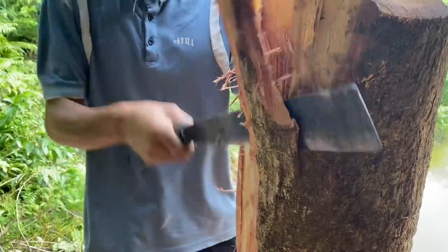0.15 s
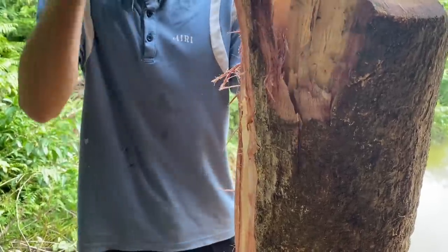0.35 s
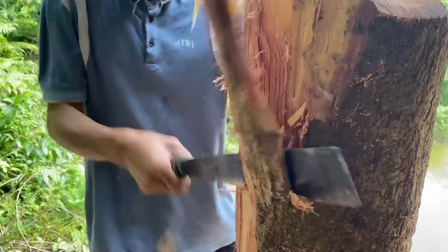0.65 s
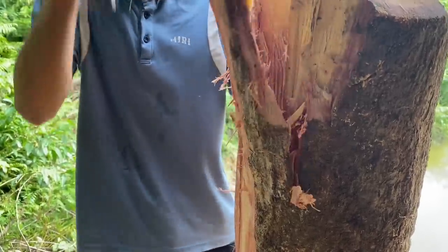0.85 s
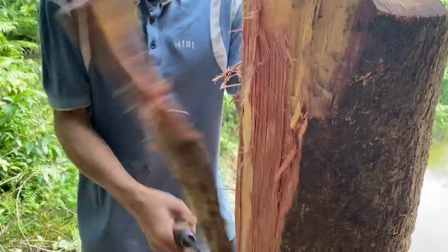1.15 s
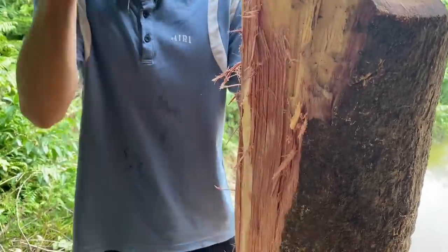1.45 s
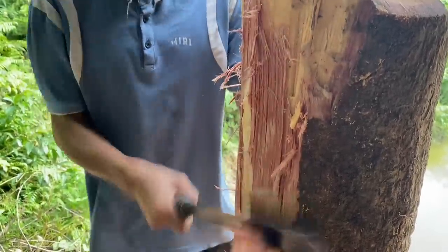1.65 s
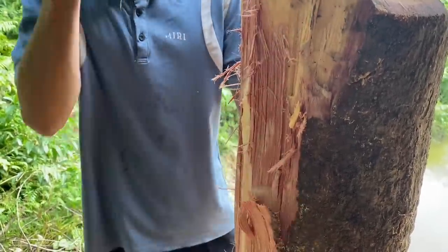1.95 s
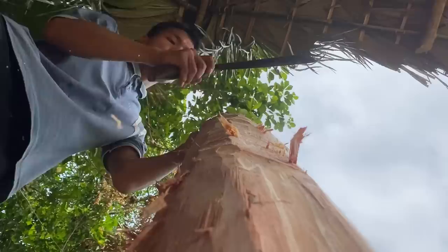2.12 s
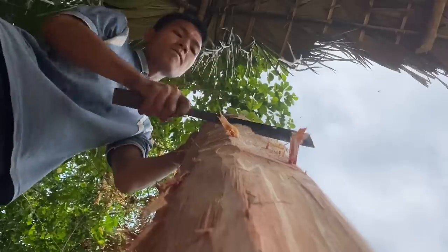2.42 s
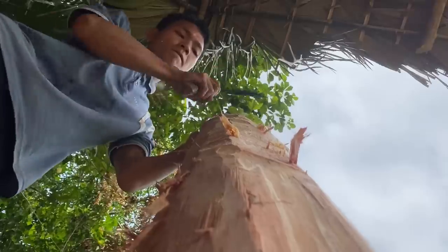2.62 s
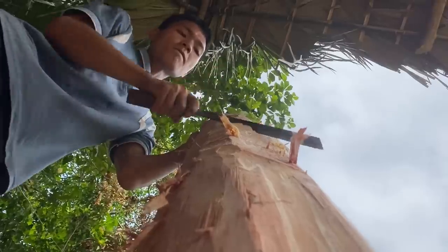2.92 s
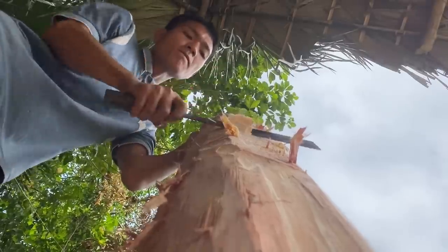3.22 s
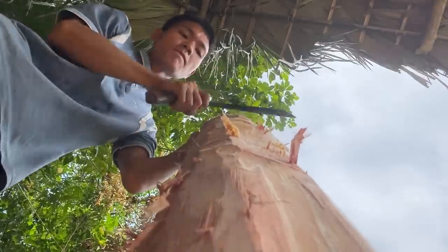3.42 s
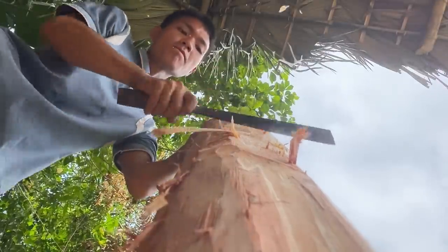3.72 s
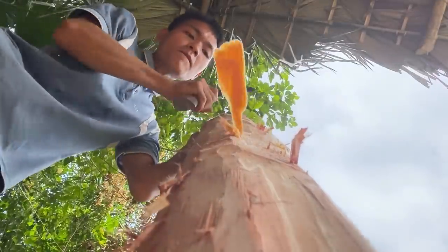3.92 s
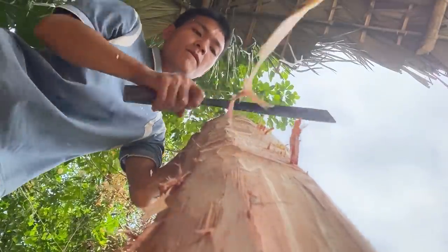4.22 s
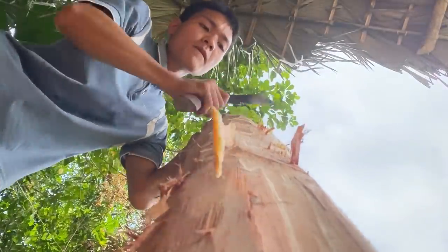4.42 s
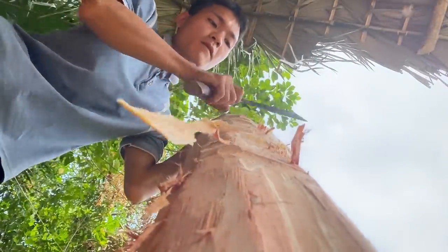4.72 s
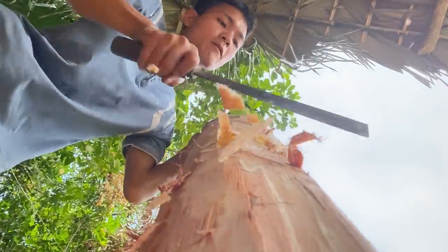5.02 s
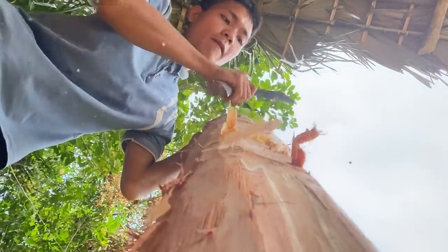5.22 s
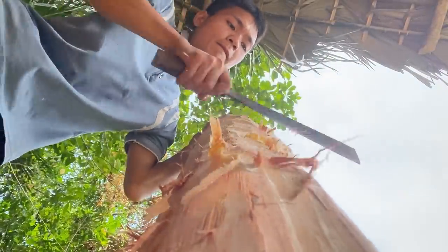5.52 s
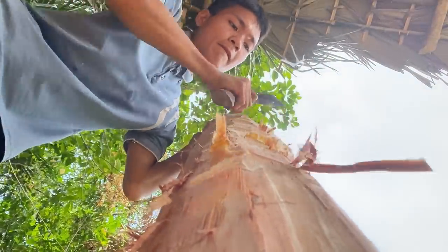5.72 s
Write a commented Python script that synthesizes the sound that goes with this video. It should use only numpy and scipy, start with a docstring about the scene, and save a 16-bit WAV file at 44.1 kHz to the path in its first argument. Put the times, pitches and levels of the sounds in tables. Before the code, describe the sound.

Outdoors, quiet air and a thin steady insect hiss lie under regular machete blows on a standing log. From 0 to 2.1 s the microphone is beside the cut: strokes at about 0.04, 0.54, 1.05, 1.63 and 2.12 s are bright, dry, fibrous cracks with short damped steel clinks, rustling shirt and low puffs of air. A scrape follows the first at 0.2 s; a strip tears at 1.05 s and chips tick around 1.2-1.3 s. At 2.16 s the perspective abruptly changes to the foot of the log. Blows at 2.38, 2.79, 3.21, 3.62, 4.04, 4.5, 4.91, 5.37 and 5.82 s are duller cracks with a prominent hollow knock around 550 Hz and low ground jolts, the hardest being the early ones. Small ticks and scrapes fall between, a woody tap at 3.35 s, dull bumps near 5.28 s. The background becomes lower and duller; reverberation stays short.

```python
"""A machete trims a standing log outdoors, over a slight breeze and a faint hiss of insects.
At first we listen beside the cut: bright cracks of bursting fibres, clinks of steel, rustling cloth, puffs of air.
Then we listen at the foot of the log: duller cracks, a loud hollow knock and jolts of the ground.
Fibres and chips are enveloped noise with a resonance; log, ground and steel are sums of swelling modes;
puffs, cloth, air and insects are coloured noise."""
import sys
import numpy as np
from scipy import signal
from scipy.fft import rfft, irfft, next_fast_len
from scipy.io import wavfile
from scipy.ndimage import uniform_filter1d

SR = 44100
rng = np.random.default_rng(int(sys.argv[2]) if len(sys.argv) > 2 else 0)


def output_pcm(signal):
    """Save a mono or channel-first signal as 16-bit PCM at the path in sys.argv[1].

    Samples are clipped to [-1, 1] before scaling.
    """
    pcm = np.clip(np.atleast_2d(signal).T, -1, 1) * 32767
    wavfile.write(sys.argv[1], SR, np.round(pcm).astype(np.int16))


N = 258426
TIME = np.arange(N) / SR
AGE = np.arange(12000) / SR   # time since the start of one short sound [s]
MOVE_S = 2.16   # the listening place changes

# blade bites, up to three in a stroke: (time [s], cutting time [s], 60 dB fade before band shares [s],
# crack level [dB], brightness [dB], splinter pitch [Hz], splinter level [dB], knock level [dB],
# knock pitch [Hz], knock overtones [dB])
BITES = [(0.039, 0.0029, 0.038, -20, 1.5, 1076, 10, -36, 560, -3),
         (0.0467, 0.0079, 0.041, -23.5, 8, 1042, -2, -38, 537, -11),
         (0.5404, 0.0037, 0.07, -20, 7, 2480, 1.5, -42, 562, 8.5),
         (0.547, .0027, 0.028, -23, 6.5, 1770, 4.5, -41, 550, 8.5),
         (1.0493, 0.0031, 0.042, -19, 4, 3480, -6, -53.5, 584, 7),
         (1.6287, .0063, 0.043, -23, 9.5, 2360, 15.5, -47, 524, -7.5),
         (2.114, 0.0062, 0.032, -42.5, 14, 2020, 6.5, -74.5, 557, 3.5),
         (2.1224, 0.0029, .071, -22.5, 6.5, 1580, -1, -36, 522, 4.5),
         (2.3797, 0.0045, 0.029, -21.5, -3, 1355, 5, -16, 558.4, -7.5),
         (2.7912, 0.002, 0.017, -14.5, -8, 1210, 8, -15.5, 542, -5.5),
         (3.209, 0.0014, 0.06, -16.5, -0.5, 874, 1, -18, 531.6, 1),
         (3.6097, 0.0023, 0.053, -26, -4, 903, 0.5, -24.5, 548.5, 3.5),
         (3.619, 0.0014, 0.081, -19.5, 0, 870, -3, -27, 568, 1),
         (3.645, 0.0033, 0.046, -27, -1, 840, 20, -26, 546, -7.5),
         (4.0322, 0.0037, 0.069, -32.5, -6.5, 827, 6.5, -28.5, 525.3, 7),
         (4.0433, 0.0037, 0.043, -23.5, -3.5, 778, 10.5, -29.5, 569, 3.5),
         (4.078, .0016, 0.031, -23, 8, 11000, 9, -51, 540, -2),
         (4.502, 0.0033, 0.015, -22.5, -1.5, 2180, 5.5, -21.5, 545, -10.5),
         (4.907, 0.0025, 0.025, -32, -2.5, 2140, 4.5, -27, 542, 0.5),
         (4.915, 0.0044, 0.012, -20.5, 2.5, 5500, -2, -46, 571, 14),
         (5.371, 0.006, 0.0097, -25.5, 7.5, 6300, -12, -26.5, 544, -0.5),
         (5.8187, 0.0078, 0.075, -33.5, 3.5, 2980, 2, -27, 541, -3.5)]
# strips peeling off behind the edge: (time [s], length [s], level [dB])
TEARS = [(1.058, .015, -31), (4.084, 0.013, -39.5), (4.94, 0.0041, -35), (5.386, 0.021, -37),
         (5.841, .03, -39.5)]
TEAR_T60_S, TEAR_HZ = 0.084, 6050
# colour of bursting fibres: (frequency [Hz], relative level [dB per Hz])
FIBRE_COLOUR = [(60, -16.5), (250, 10), (700, 3.5), (1200, -2), (3000, -1.5), (5000, -8), (7600, -6.5),
                (8600, -17), (9600, -3.5), (11500, -4.5), (13000, -13.5), (15500, -16), (17000, -38)]
# edges of the low, middle and high crackle bands: (frequency [Hz])
BAND_EDGES_HZ = [40, 950, 5000, 19000]
# nominal centres of those bands: (frequency [Hz])
BAND_CENTRES_HZ = [500, 2500, 9000]
# blade modes, damped by the gripping wood: (pitch [Hz], relative level [dB], swell time [s], left-right [dB])
BLADE_MODES = [(1110, -14.5, 0.00057, -2), (1756, -19, 0.0013, -2), (2071, 4, 0.0033, -0.5),
               (2336, 0, 0.0023, 6.5), (2570, -5, 0.0019, -5), (3330, -10.5, 0.0053, -4),
               (4420, -20, 0.0023, 2.5), (4500, -14, 0.011, -1.5), (5464, -6.5, 0.0043, -2.5),
               (6380, -10, 0.0092, -5.5), (8800, -20.5, 0.0075, 8.5), (11100, -15.5, 0.011, 0.5),
               (11100, -8.5, 0.0093, 2.5)]
# log modes, for a knock pitch of LOG_HZ:
# (pitch [Hz], relative level [dB], swell time [s], left-right before leaning [dB])
LOG_MODES = [(277, -1, 0.0046, -11.5), (393, -6.5, 0.0045, -5.5), (547, 4, 0.0049, -9),
             (821, -7.5, 0.0069, -4), (1270, -27, 0.0015, -13.5), (1437, -15, 0.0078, -2.5)]
LOG_HZ, OVERTONES_ABOVE_HZ = 550, 700
# modes of the log rocking on the soil: (pitch [Hz], relative level [dB], swell time [s], left-right [dB])
GROUND_MODES = [(57.4, 4, 0.021, 10), (78.84, 5, 0.015, -8), (120.5, 6.5, 0.0039, -9.5)]
JOLT_DELAY_S, JOLT_LOSS_PER_OVERTONE_DB = 0.0076, 0.88   # the loss is dB per dB of overtones
# dull bumps of loose wood and of something near the microphone: (time [s], level [dB], pitch [Hz])
BUMPS = [(2.937, -50.5, 555), (5.272, -33, 196), (5.278, -29, 135), (5.288, -26, 85)]
# chips snap off and land, the blade taps the wood: (time [s], level [dB], pitch [Hz])
CHIPS = [(0.7607, -50, 1076), (0.9819, -39.5, 4740), (1.2009, -47.5, 4360), (1.2267, -34.5, 3740),
         (1.2725, -35.5, 8530), (1.2902, -31, 4740), (1.3685, -44.5, 4170), (1.5098, -50.5, 1100),
         (2.0426, -47, 2380), (2.7393, -47.5, 4910), (3.3470, -28, 503), (4.2119, -51, 6300),
         (4.3548, -41, 5400), (4.37, -43.5, 5000), (4.656, -53, 1410), (4.8262, -55.5, 5950),
         (4.9764, -45, 1930), (5.2699, -40, 1410), (5.5461, -35.5, 2053), (5.7635, -49.5, 934)]
# blade drawn out, bark tearing: (middle [s], fade constant each way [s], level [dB], pitch [Hz])
SCRAPES = [(0.188, 0.0098, -39, 2650), (0.22, 0.0041, -29, 2370), (0.69, 0.0043, -49.5, 4300),
           (1.243, 0.13, -56.5, 5160), (1.439, 0.013, -55.5, 6500), (3.345, 0.02, -44.5, 3026),
           (3.371, 0.0073, -39, 4735), (4.37, 0.0083, -52, 5450), (5.278, 0.0064, -40.5, 734)]
# the arm swings past the microphone: (time [s], length [s], level [dB])
SWINGS = [(0.715, 0.099, -37), (0.915, 0.0092, -49.5), (1.235, 0.023, -37.5), (1.44, 0.015, -34),
          (1.56, .04, -43), (1.655, 0.1, -40), (2.078, 0.11, -35)]
# colour of the pushed air: (frequency [Hz], relative level [dB per Hz])
PUFF_COLOUR = [(20, -6.5), (50, 5.5), (85, 3.5), (150, -7), (220, -28.5), (400, -46), (1000, -79.5)]
PUFF_RISE_DB_PER_S, PUFF_FALL_DB_PER_S, BREEZE_DB = 660, 328.5, -60.5
# colour of the rustling shirt: (frequency [Hz], relative level [dB per Hz])
SHIRT_COLOUR = [(300, -19.5), (900, -5.5), (2500, -2.5), (6500, -5.5), (11000, -10.5), (16000, -11)]
SHIRT_RISE_DB_PER_S, SHIRT_FALL_DB_PER_S = 404, 58
# background air beside the cut: (frequency [Hz], relative level [dB per Hz])
AIR_BESIDE = [(80, -20.5), (150, -8.5), (320, -12), (1400, -19.5), (7000, -22), (10500, -18.5),
              (15000, -22), (16500, -41.5)]
# background air at the foot: (frequency [Hz], relative level [dB per Hz])
AIR_BELOW = [(18, -18), (30, -18), (97, 7), (150, -6), (260, -13.5), (500, -15), (1000, -28), (3700, -31.5),
             (6400, -35), (11000, -35), (16000, -35)]
AIR_BESIDE_DB, AIR_BELOW_DB = -67, -62
# hiss of insects: (frequency [Hz], relative level [dB per Hz])
INSECT_COLOUR = [(5500, -47.5), (6700, -19.5), (7200, -2), (7800, 3.5), (8100, -12), (8600, -42.5)]
CUTOFF_HZ = 16300


def chops(rows, decay_shares, presence_db):
    """Each bite is a crack of parting fibres; the bands fade at their own pace."""
    out = np.zeros((2, N))
    for s, cut_s, t60, db, bright_db, hz, splinter_db, *_ in rows:
        shapes = [strike(cut_s, t60 * share, rise_s=0.00065) for share in decay_shares]
        levels = tilted(db, bright_db, presence_db)
        add(out, s, crackle(shapes, levels, hz, grain_db=2.5, splinter_db=splinter_db))
    return out


def tears(rows, bright_db, presence_db):
    """A peeling strip keeps the fibres crackling after the bite."""
    out = np.zeros((2, N))
    for s, length_s, db in rows:
        shapes = [strike(length_s, TEAR_T60_S, rise_s=0.0024)] * len(BAND_CENTRES_HZ)
        levels = tilted(db, bright_db, presence_db)
        add(out, s, crackle(shapes, levels, TEAR_HZ, grain_db=2.0, splinter_db=-7.5))
    return out


def crackle(shapes, levels_db, hz, grain_db, splinter_db):
    """Fibres break in quick uneven snaps and the splinter rings with them; one shape and level per band."""
    unevenness = rms_one(uniform_filter1d(rng.standard_normal(len(AGE)), size=36))
    snaps = noise(FIBRE_COLOUR, len(AGE), side_db=-4.5) * from_db(grain_db * unevenness)
    out = 0
    for shape, db, edges in zip(shapes, levels_db, zip(BAND_EDGES_HZ, BAND_EDGES_HZ[1:])):
        force = snaps * shape
        force = force + from_db(splinter_db) * resonate(force, hz, width_hz=hz * 0.095)
        band = signal.sosfilt(signal.butter(3, edges, "band", fs=SR, output="sos"), force)
        # filtering must not change the loudness that the shape asks for
        out = out + from_db(db) * rms_one(band) * np.sqrt(np.mean(shape ** 2))
    return out


def strike(cut_s, t60, rise_s):
    """The force rises quickly, lasts while the edge cuts and then fades."""
    return np.minimum(AGE / rise_s, 1) * from_db(-60 * np.maximum(AGE - cut_s, 0) / t60)


def tilted(db, bright_db, presence_db):
    """Low, middle and high levels of a crack: brightness trades bass for treble, presence shifts the middle."""
    return db - bright_db, db + presence_db, db + bright_db


def blade(rows, ring_level_db, uneven_db):
    """The steel clinks briefly, as hard as the crack; every bite gives each mode another strength."""
    out = np.zeros((2, N))
    all_chances = rng.standard_normal((len(rows), len(BLADE_MODES)))
    for (s, _, _, crack_db, *_), chances in zip(rows, all_chances):
        for (hz, db, swell_s, side_db), chance in zip(BLADE_MODES, chances):
            gain = from_db(crack_db + ring_level_db + db + uneven_db * chance)
            add(out, s, gain * pan(side_db) * swell(AGE, hz, swell_s))
    return out


def knocks(rows, lean):
    """The log answers each bite with a hollow note; pitch and overtones depend on where it is struck."""
    out = np.zeros((2, N))
    for s, *_, knock_db, knock_hz, overtones_db in rows:
        for hz, db, swell_s, side_db in LOG_MODES:
            gain = from_db(knock_db + db + overtones_db * (hz > OVERTONES_ABOVE_HZ))
            note = swell(AGE, hz * knock_hz / LOG_HZ, swell_s)
            add(out, s + .0012, gain * pan(lean * side_db) * note)
    return out


def jolts(rows, jolt_db):
    """The log rocks on the soil just after each knock, most after a square blow with weak overtones."""
    out = np.zeros((2, N))
    rocking = sum(from_db(db) * pan(side_db) * swell(AGE, hz, swell_s)
                  for hz, db, swell_s, side_db in GROUND_MODES)
    for s, *_, knock_db, _, overtones_db in rows:
        gain = from_db(knock_db + jolt_db - JOLT_LOSS_PER_OVERTONE_DB * overtones_db)
        add(out, s + JOLT_DELAY_S, gain * rocking)
    return out


def bumps():
    """Loose wood and something near the microphone bump dully, one short low mode each."""
    out = np.zeros((2, N))
    for s, db, hz in BUMPS:
        add(out, s, from_db(db) * pan(db=-5.5) * swell(AGE, hz, swell_s=0.0075))
    return out


def chips():
    """Chips and taps give single short ticks, fading soonest in the treble."""
    out = np.zeros((2, N))
    snap = [strike(.0008, t60, rise_s=.0003) for t60 in (.03, .014, .011)]
    for s, db, hz in CHIPS:
        levels = centred(db, hz, db_per_octave=5.5)
        add(out, s, crackle(snap, levels, hz, grain_db=-2.5, splinter_db=11.5))
    return out


def scrapes():
    """Tearing bark and the withdrawn blade give swells of coarse crackle."""
    out = np.zeros((2, N))
    lead_s = .06   # the swell peaks this long after its start
    for s, fade_s, db, hz in SCRAPES:
        shape = np.exp(-np.abs(AGE - lead_s) / fade_s) * np.minimum(AGE / lead_s, 1)
        levels = centred(db, hz, db_per_octave=4.5)
        rasp = crackle([shape] * len(BAND_CENTRES_HZ), levels, hz, grain_db=4.5, splinter_db=-1.5)
        add(out, s - lead_s, rasp)
    return out


def centred(db, hz, db_per_octave):
    """Low, middle and high levels of a small piece of wood: loudest near its own pitch."""
    octaves = np.abs(np.log2(np.array(BAND_CENTRES_HZ) / hz))
    return db - db_per_octave * (octaves - octaves.min())


def puffs(rows, bite_puff_db):
    """Lumps of low wind noise follow the arm: one with each bite, one with each swing, over a slight breeze."""
    wind = noise(PUFF_COLOUR, N, side_db=-13.0)
    # even out the wind's own swells, so that the arm alone shapes the level
    power = uniform_filter1d(np.mean(wind ** 2, axis=0), size=2200)
    wind = wind / np.sqrt(power + 1e-6)
    pushes = SWINGS + [(s, cut_s, db + bite_puff_db) for s, cut_s, _, db, *_ in rows]
    return (gestures(pushes, PUFF_RISE_DB_PER_S, PUFF_FALL_DB_PER_S) + from_db(BREEZE_DB)) * wind


def shirt(rows, cloth_db):
    """Soft rubbing of cloth swells up to each bite and settles slowly."""
    shakes = [(s, cut_s, db + cloth_db) for s, cut_s, _, db, *_ in rows]
    rubbing = gestures(shakes, SHIRT_RISE_DB_PER_S, SHIRT_FALL_DB_PER_S)
    return rubbing * noise(SHIRT_COLOUR, N, side_db=-3.0)


def gestures(rows, rise_db_per_s, fall_db_per_s):
    """Gain of movements (time [s], length [s], level [dB]) that build, hold and die away; the loudest wins."""
    levels = []
    for s, length_s, db in rows:
        before, after = np.maximum(s - TIME, 0), np.maximum(TIME - s - length_s, 0)
        levels.append(db - rise_db_per_s * before - fall_db_per_s * after)
    return from_db(np.max(levels, axis=0))


def air(colour, db, side_db):
    """The steady background of the place is coloured stereo noise."""
    return from_db(db) * noise(colour, N, side_db)


def insects(db, side_db):
    """Insects blend into a steady narrow hiss in the treble."""
    return from_db(db) * noise(INSECT_COLOUR, N, side_db)


def outdoors(x, wet_db, t60, lag_s):
    """Leaves, ground and thatch scatter a short uneven tail; the direct sound reaches one side first."""
    echoes = from_db(5.2 * rms_one(uniform_filter1d(rng.standard_normal(len(AGE)), size=20)))
    colour = [(80, -10), (400, -1.5), (1500, -0.5), (6000, 4.5), (15000, -3)]   # (Hz, dB per Hz)
    tail = noise(colour, len(AGE), side_db=-2.5) * echoes
    tail = tail * from_db(-60 * AGE / t60) * np.clip((AGE - .004) / 0.002, 0, 1)
    wet = signal.fftconvolve(x, rms_one(tail) / np.sqrt(len(AGE)), axes=1)[:, :N]
    # a phase slope shifts the right side by a fraction of a sample or more; positive is later
    fast = next_fast_len(N)
    shift = np.exp(-2j * np.pi * np.fft.rfftfreq(fast, 1 / SR) * lag_s)
    right = irfft(rfft(x[1], fast) * shift, fast)[:N]
    return np.array([x[0], right]) + from_db(wet_db) * wet


def from_db(db):
    """Decibels to gain."""
    return 10 ** (np.asarray(db) / 20)


def rms_one(x):
    """Scale to rms 1."""
    return x / np.sqrt(np.mean(x ** 2) + 1e-20)


def pan(db):
    """Left and right gains whose total power stays the same."""
    return rms_one(from_db([[db / 2], [-db / 2]]))


def add(out, start, sound):
    """Mix a sound in at its time."""
    at = max(round(start * SR), 0)
    out[:, at:at + sound.shape[1]] += sound[:, :max(N - at, 0)]


def noise(colour, size, side_db):
    """Stereo noise with a given spectrum and width; rms 1."""
    hz, db = np.transpose(colour)
    fast = next_fast_len(size)
    log_hz = np.log(np.fft.rfftfreq(fast, 1 / SR) + 1)
    gain = from_db(np.interp(log_hz, np.log(hz), db))
    mid, side = irfft(rfft(rng.standard_normal((2, fast))) * gain, fast)[:, :size]
    return rms_one(mid + from_db(side_db) * side * [[1], [-1]])


def resonate(x, hz, width_hz):
    """One resonance with gain 1 on top."""
    r = np.exp(-np.pi * width_hz / SR)
    zeros = np.array([1, 0, -1]) * (1 - r * r) / 2
    poles = [1, -2 * r * np.cos(2 * np.pi * hz / SR), r * r]
    return signal.lfilter(zeros, poles, x)


def swell(age, hz, swell_s):
    """A mode that builds while the blow pushes, then dies away; rms 1 at its height."""
    envelope = age / swell_s * np.exp(1 - age / swell_s)
    return np.sqrt(2) * envelope * np.sin(2 * np.pi * hz * age)


def beside_the_cut(rows, strips, bits):
    """Close to the blade: bright cracks, cloth and puffs of air."""
    hits = chops(rows, (1.05, .95, .95), presence_db=7.5)
    hits += tears(strips, bright_db=6.5, presence_db=7.5)
    hits += blade(rows, ring_level_db=-8.0, uneven_db=6.5)
    hits += knocks(rows, lean=0.089)
    work = outdoors(hits + bits, wet_db=-25.5, t60=0.23, lag_s=2.9e-5)
    movement = puffs(rows, bite_puff_db=-19.5) + shirt(rows, cloth_db=-32.0)
    background = air(AIR_BESIDE, AIR_BESIDE_DB, side_db=0.5) + insects(db=-69, side_db=0.0)
    return work + movement + background


def at_the_foot(rows, strips, bits):
    """Under the log: the hollow knock and the soil are loud, the cracks duller."""
    cracks = chops(rows, (1.1, 1.05, .7), presence_db=0.45)
    cracks += tears(strips, bright_db=1.0, presence_db=-6.5)
    cracks += blade(rows, ring_level_db=-17.0, uneven_db=2.5)
    cracks = outdoors((cracks + bits) * pan(db=-2.0), wet_db=-15.0, t60=0.19, lag_s=-0.000044)
    hollow = outdoors(knocks(rows, lean=1.085), wet_db=-17.0, t60=0.15, lag_s=-0.000056)
    thuds = jolts(rows, jolt_db=-20.0) + bumps()
    background = air(AIR_BELOW, AIR_BELOW_DB, side_db=-6.0) + insects(db=-70.5, side_db=-1.0)
    return cracks + hollow + thuds + background


def scene():
    """The same work heard first from beside the cut, then from the foot of the log."""
    bits = chips() + scrapes()
    early_bites, late_bites = [b for b in BITES if b[0] < MOVE_S], [b for b in BITES if b[0] >= MOVE_S]
    early_tears, late_tears = [t for t in TEARS if t[0] < MOVE_S], [t for t in TEARS if t[0] >= MOVE_S]
    beside = beside_the_cut(early_bites, early_tears, bits * (TIME < MOVE_S))
    below = at_the_foot(late_bites, late_tears, bits * (TIME >= MOVE_S))
    moved = np.clip((TIME - MOVE_S) / .002 + .5, 0, 1)   # 2 ms crossfade
    return (1 - moved) * beside + moved * below


def record(dry):
    """The highest peaks are rounded, the top is cut."""
    rounded = dry / (1 + (dry / .9) ** 4) ** (1 / 4)
    return signal.sosfilt(signal.ellip(10, .2, 80, CUTOFF_HZ, fs=SR, output="sos"), rounded)


dry = scene()
out = record(dry)
output_pcm(out)
```